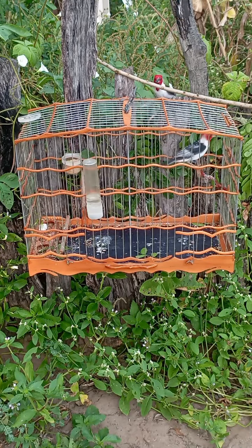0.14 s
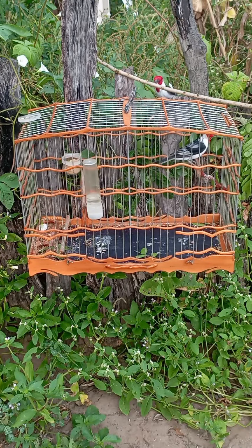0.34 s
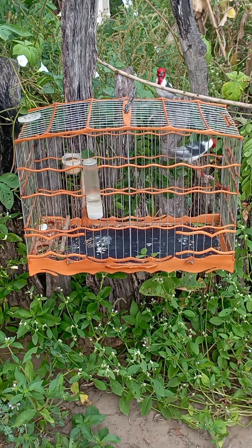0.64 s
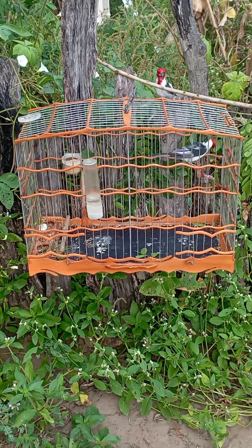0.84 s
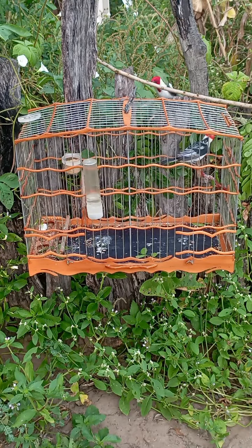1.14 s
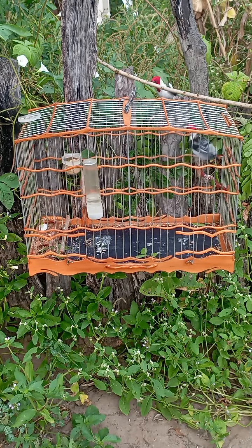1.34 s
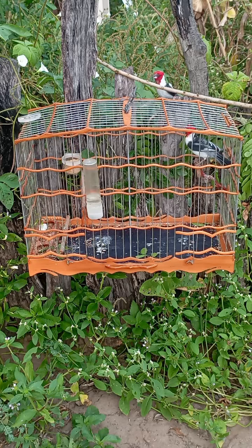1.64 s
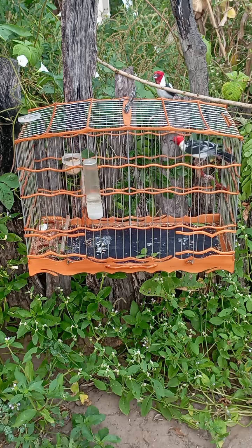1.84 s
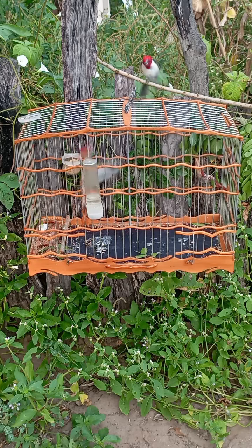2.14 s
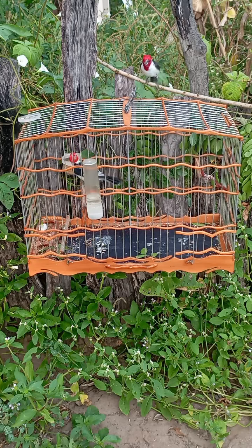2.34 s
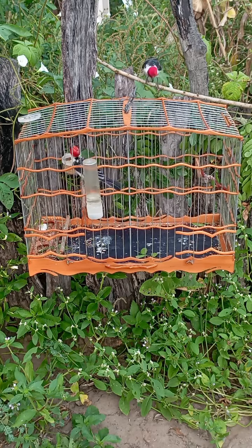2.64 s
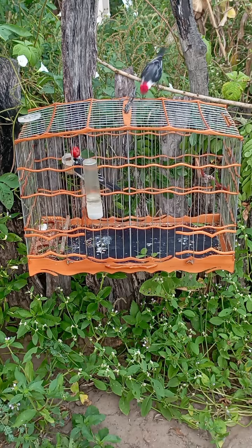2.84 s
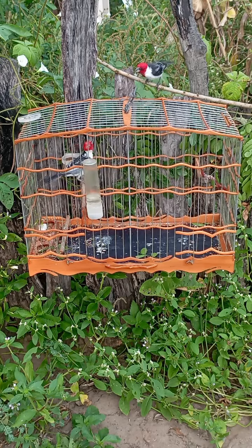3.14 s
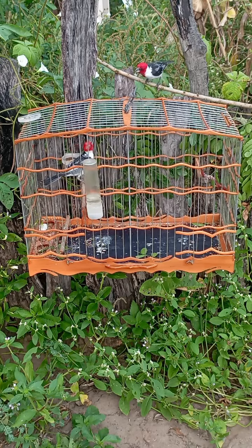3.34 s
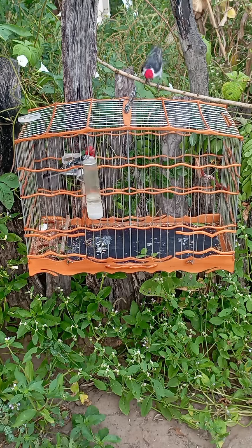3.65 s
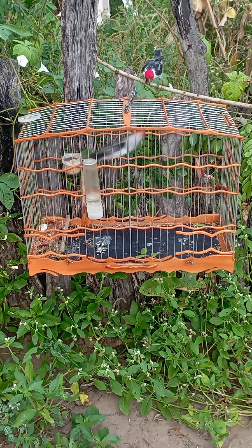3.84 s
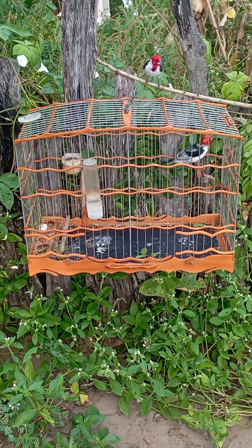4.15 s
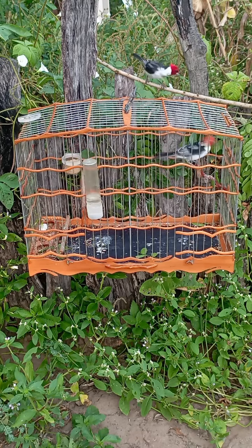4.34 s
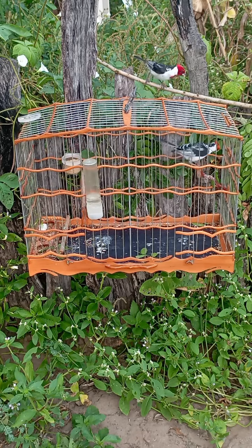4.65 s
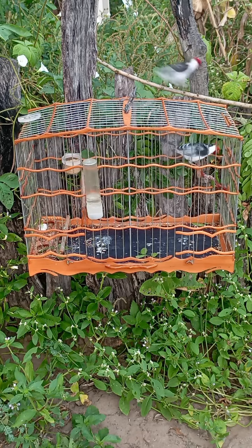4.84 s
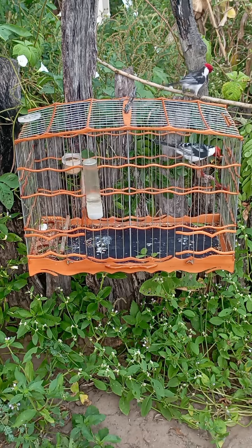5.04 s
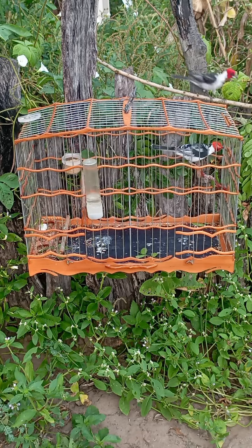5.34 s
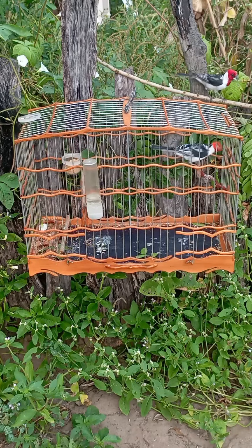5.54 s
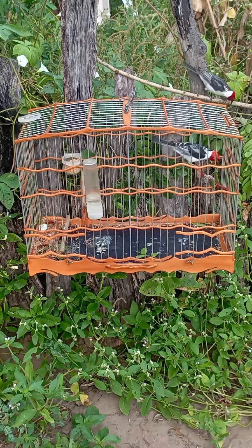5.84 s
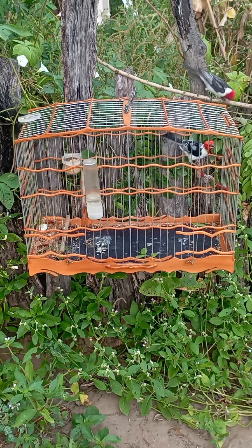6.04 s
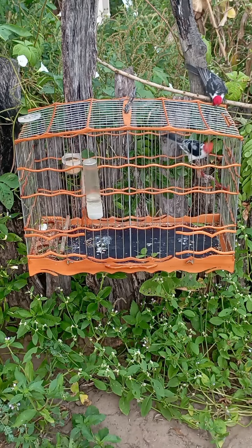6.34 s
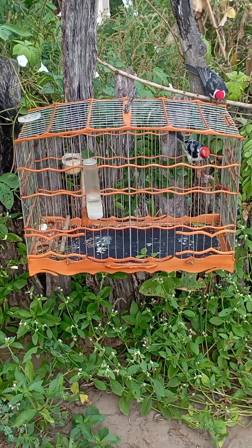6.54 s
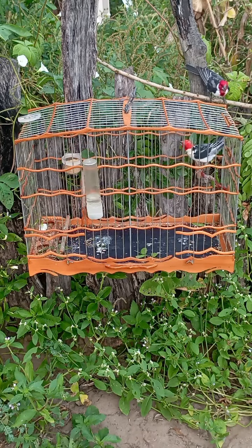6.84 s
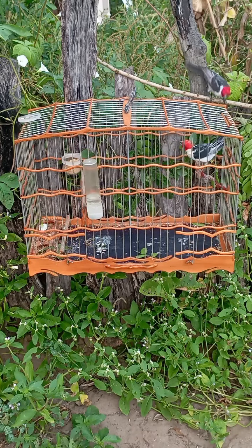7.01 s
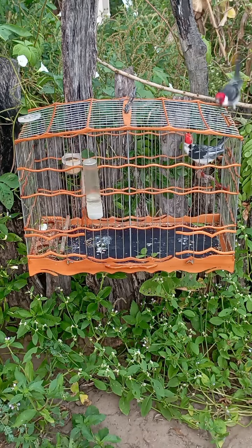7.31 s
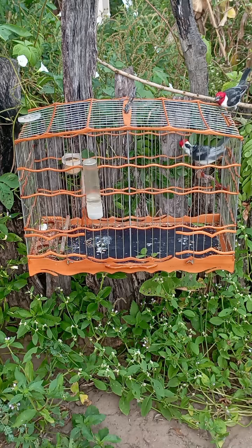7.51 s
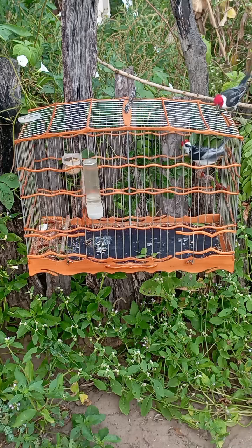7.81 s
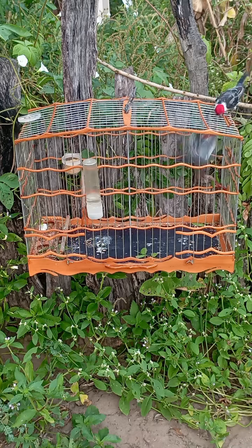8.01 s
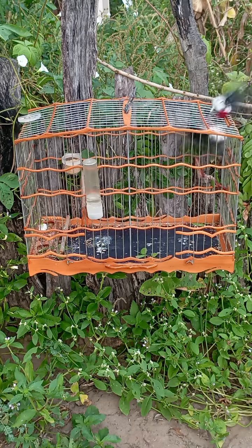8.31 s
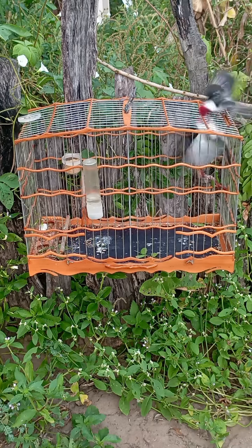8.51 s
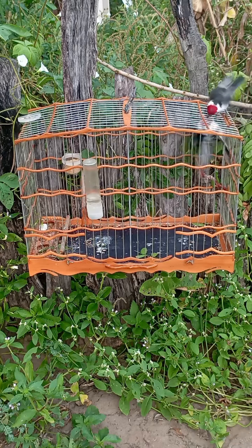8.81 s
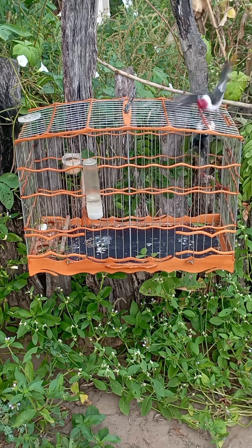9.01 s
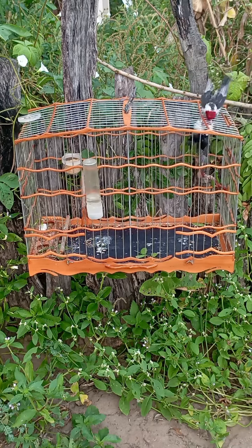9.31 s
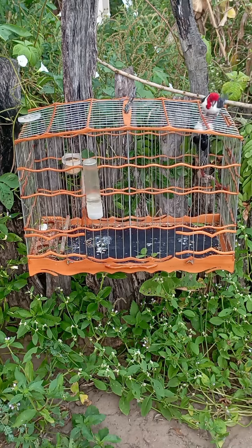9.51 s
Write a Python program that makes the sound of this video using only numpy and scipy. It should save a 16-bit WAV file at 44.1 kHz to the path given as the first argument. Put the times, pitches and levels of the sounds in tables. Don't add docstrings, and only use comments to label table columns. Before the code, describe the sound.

Stereo outdoor sound with little echo: crickets chirp in rapid bouts, slightly left, over a distant hum. One scratchy chip opens, then a rising loud chip, a whistle with a chip, and later a louder piercing whistle and quick doubled notes. Something hollow drags over grit and bumps, mostly toward the right. Finally two small birds scuffle through the wire, with dry rattling feather bursts and soft puffs of air.

```python
import sys
import numpy as np
from scipy import signal
from scipy.io import wavfile
from scipy.ndimage import uniform_filter1d

SR = 44100
rng = np.random.default_rng(int(sys.argv[2]) if len(sys.argv) > 2 else 0)


def waveform_to_disk(signal):
    frames = np.transpose(np.atleast_2d(signal))
    scaled = np.clip(frames, -1, 1) * 32767
    samples = np.round(scaled).astype(np.int16)
    wavfile.write(sys.argv[1], SR, samples)


def natural_amplitude(level_db):
    exponent = np.asarray(level_db, float) / 20
    return 10 ** exponent


N = 426447

# (first pulse [s], pulses [count])
LOW_CRICKET_BOUTS = [(.222, 20), (1.057, 17), (1.855, 19), (2.7, 18), (3.495, 18), (4.28, 19), (5.11, 16),
                     (5.905, 19), (6.726, 17), (7.605, 16), (8.395, 17), (9.285, 16)]
LOW_CRICKET_DB = [-0.2, -0.8, 0, -0.5, -0.2, -0.2, -0.5, -1, -2, -2, -0.3, -2.5]


def rms_one(x):
    return x / np.sqrt(np.mean(x ** 2) + 1e-20)


def in_time(rows, outside=None):
    s, *columns = np.transpose(rows)
    return [np.interp(np.arange(N) / SR, s, c, outside, outside) for c in columns]


def at_hz(points, hz):
    known_hz, known_db = np.array(points)[:, :2].T
    return np.interp(np.log(hz), np.log(known_hz), known_db)


def band(x, low_hz, high_hz, order=2):
    limits = [low_hz, min(high_hz, .45 * SR)]
    return signal.sosfilt(signal.butter(order, limits, "band", fs=SR, output="sos"), x)


def low_pass(x, hz, order):
    return signal.sosfilt(signal.butter(order, hz, fs=SR, output="sos"), x)


def drift(rate):
    return np.interp(np.arange(N) * rate / SR, np.arange(N // 100), rng.standard_normal(N // 100))


def coloured(spectrum, white):
    lowest, highest = spectrum[0][0], spectrum[-1][0]
    edges = lowest * 2 ** np.arange(0, np.log2(highest / lowest) + .1, 1 / 3)
    out = 0
    for k, (low, high) in enumerate(zip(edges, edges[1:])):
        gain = natural_amplitude(at_hz(spectrum, np.sqrt(low * high)))
        out = out + (-1) ** k * gain * band(white, low, high)
    return out


def resonance(x, hz, width):
    r = np.exp(-np.pi * width / SR)
    return signal.lfilter([(1 - r * r) / 2, 0, (r * r - 1) / 2], [1, -2 * r * np.cos(2 * np.pi * hz / SR), r * r], x)


def ports(x, lead, shade_db, shade_hz):
    late = np.interp(np.arange(N) - np.abs(lead), np.arange(N), x)
    bass = low_pass(late, shade_hz, 2)
    late = bass + natural_amplitude(shade_db) * (late - bass)
    return np.where(np.asarray(lead) >= 0, [x, late], [late, x])


def leaves(x, wet_db, t60):
    tail = rng.standard_normal((2, SR // 10)) * natural_amplitude(wet_db - 60 * np.arange(SR // 10) / SR / t60)
    tail[:, 0] = 1
    return signal.fftconvolve(np.atleast_2d(x), tail, axes=1)[:, :N]


def bursts(s, db, length, sharp):
    out, u = np.zeros(N), np.arange(int(3 * length * SR)) / (length * SR)
    shape = (1 - np.exp(-sharp * u)) * np.exp(-1.6 * u ** 2)
    for at, gain in zip(np.round(s * SR).astype(int), natural_amplitude(db)):
        out[at:at + len(u)] += (gain * shape)[:N - at]
    return out


def air():
    # (pitch [Hz], level [dB per Hz])
    rumble_spectrum = [(18, -38), (30, -11), (69, -2.5), (140, 2), (350, -6.5), (492, -7.5), (1200, -26.5)]
    # (pitch [Hz], level [dB per Hz])
    leaf_spectrum = [(1550, -20.5), (4310, -25), (5310, -19), (6050, -11), (6720, -20), (7260, -33.5),
                     (10700, -30.5), (15500, -38)]
    # (pitch [Hz], likeness [0 to 1])
    likeness = [(60, 0.068), (240, 0.45), (950, 0.16), (3770, 0.022), (15000, 0.047)]
    # (time [s], level [dB])
    breeze = [(0, -70), (2.3, -65.5), (4.2, -63.5), (4.7, -69.5), (5.5, -68.5), (6.3, -65.5), (7.2, -65),
              (7.65, -67.5), (8.3, -67), (9.0, -62.5), (9.35, -67.5), (9.67, -70)]
    rumble_db, leaves_db, gust_db, hum_db, flicker_db = -59, 0.5, -0.5, -66.5, 2.6
    breeze_db = in_time(breeze)[0] + gust_db * drift(1.33)
    hum = rms_one(resonance(rng.standard_normal(N), 67.8, 8.6))
    layers, edges = [0, 0], 35 * 2 ** np.arange(0, 9.1, .5)
    white = rng.standard_normal((2, 2, N))
    for k, (low_hz, high_hz) in enumerate(zip(edges, edges[1:])):
        mid, side = band(white[k % 2], low_hz, high_hz)
        hz = np.sqrt(low_hz * high_hz)
        alike = np.clip(at_hz(likeness, hz), 0, 1)
        tilt_db = np.array([[1], [-1]]) * 2.3 * (hz > 5000)
        gain = natural_amplitude(at_hz(rumble_spectrum + leaf_spectrum, hz) + flicker_db * drift(8) + tilt_db)
        both = np.sqrt(1 + alike) * mid + np.sqrt(1 - alike) * side * [[1], [-1]]
        layers[int(hz > 800)] += gain * both
    low, high = layers
    high = high / np.std(band(high, 2380, 5430))
    return natural_amplitude(hum_db) * hum + natural_amplitude(rumble_db) * rms_one(low) + natural_amplitude(leaves_db + breeze_db) * high


def chorus():
    out, t = np.zeros((2, N)), np.arange(N) / SR
    swell, swell_db, lag_s = 0, 13.5, 0.013
    for (s, count), db in zip(LOW_CRICKET_BOUTS, LOW_CRICKET_DB):
        middle_s = s + lag_s + 0.013 * count / 2
        swell = swell + natural_amplitude(db / 2) * np.exp(-((t - middle_s) / 0.29) ** 2)
    for level_db, low_hz, high_hz in zip((-68.5, -66.5), (5060, 5300), (5250, 5550)):
        for side in range(2):
            group = 0
            for hz, rate in zip(np.linspace(low_hz, high_hz, 5), rng.uniform(38, 60, 5)):
                turn = 2 * np.pi * (hz * t + np.cumsum(42 * drift(150)) / SR)
                stroke = np.maximum(np.sin(2 * np.pi * rate * t + rate) + 1.4, 0) * natural_amplitude(4.8 * drift(5))
                group = group + stroke * (np.sin(turn) + natural_amplitude(-17.0) * np.sin(2 * turn))
            out[side] += natural_amplitude(level_db + swell_db * swell + (2.5, -.6)[side]) * rms_one(group)
    return out


def cricket(bouts, bout_db, period, hz, duty, double_db):
    out, u = np.zeros(N + SR), np.linspace(0, 1, int(duty * period * SR))
    scratch = np.tile(0.7 + drift(230), 2)
    for (s, count), level_db in zip(bouts, bout_db):
        for k, (start, push) in enumerate(rng.standard_normal((count, 2))):
            turn = 2 * np.pi * np.cumsum(hz * (1.004 - 0.01 * u)) / SR + 3 * start
            at = round((s + (k - duty / 2) * period + .5) * SR)
            overtone = natural_amplitude(double_db) * scratch[at:at + len(u)] * np.sin(1.98 * turn)
            pulse = np.sin(np.pi * u) ** 0.29 * (np.sin(turn) + overtone)
            out[at:at + len(u)] += natural_amplitude(level_db + 1.8 * push) * pulse
    return out[SR // 2:SR // 2 + N]


def near_crickets():
    # (first pulse [s], pulses [count])
    high_bouts = [(-.16, 13), (.483, 14), (1.147, 14), (1.814, 13), (2.457, 13), (3.125, 13), (3.768, 13),
                  (4.439, 13), (5.08, 14), (5.872, 11), (6.464, 14), (7.136, 13), (7.806, 13), (8.449, 14),
                  (9.113, 13)]
    high_bout_db = [0.1, 0.1, 0.1, 0.1, 0.1, 0.1, 0.1, 0.1, 0.1, 0.1, 0.1, 0.1, 0.1, 0.1, 0.1]
    # (first pulse [s], pulses [count])
    peep_bouts = [(3.525, 8)]
    high = natural_amplitude(-51.5) * cricket(high_bouts, high_bout_db, .0248, 6605, duty=.6, double_db=-59)
    low = natural_amplitude(-51) * cricket(LOW_CRICKET_BOUTS, LOW_CRICKET_DB, .0187, 5520, duty=0.65, double_db=-7.5)
    low += natural_amplitude(-67) * cricket(peep_bouts, [0], 0.026, 3420, duty=0.84, double_db=-30)
    high = ports(high, 4.94, shade_db=-5.5, shade_hz=3000)
    return high + ports(low, 5.0, shade_db=-7.5, shade_hz=5600)


def distant_birds():
    # (start [s], length [s], from [Hz], to [Hz], level [dB])
    calls = [(2.431, 0.024, 3600, 4500, -60), (2.439, 0.041, 4310, 3660, -63),
             (2.507, 0.038, 3110, 2930, -65), (2.62, 0.024, 3650, 4100, -68),
             (2.718, .018, 4500, 4000, -63), (2.88, 0.021, 2500, 3120, -64),
             (2.899, 0.015, 2880, 2500, -62), (2.93, .03, 2600, 2550, -65), (3.625, .03, 4700, 4400, -55),
             (3.653, 0.022, 3450, 3170, -60), (3.669, 0.033, 4300, 4550, -63),
             (3.71, 0.067, 4250, 3480, -67), (3.774, .025, 2950, 2830, -61),
             (3.795, .045, 2850, 2750, -67.5), (3.777, .06, 4400, 3780, -66),
             (3.868, 0.032, 2310, 2100, -66), (6.168, 0.033, 1100, 1250, -68),
             (6.189, 0.042, 3150, 3040, -62), (6.216, 0.025, 3280, 3830, -58),
             (6.23, 0.034, 3750, 3880, -60), (6.25, 0.026, 2760, 2780, -65),
             (6.339, 0.034, 2390, 1450, -67), (6.459, .016, 2860, 3700, -58),
             (6.48, 0.034, 4120, 3790, -62), (6.57, 0.035, 2315, 1580, -67.5),
             (7.205, .03, 4100, 3960, -64), (8.07, .03, 2500, 3100, -68), (8.7, .03, 4200, 3820, -62),
             (9.07, .02, 2200, 2300, -67), (9.247, 0.08, 2710, 2672, -71), (9.33, 0.033, 2450, 2070, -70),
             (9.312, 0.018, 4000, 4200, -65), (9.599, 0.021, 1600, 1430, -71.5)]
    out = np.zeros(N)
    for s, length, from_hz, to_hz, db in calls:
        pitch, at = np.geomspace(from_hz, to_hz, int(length * SR)), round(s * SR)
        tone = np.sin(2 * np.pi * np.cumsum(pitch) / SR)
        out[at:at + len(pitch)] += natural_amplitude(db) * np.hanning(len(pitch)) ** .5 * tone
    return leaves(out * natural_amplitude(4.6 * drift(220)), wet_db=-24.5, t60=0.17)


def far_bird():
    # (offset [s], length [s], from [Hz], to [Hz], level [dB])
    phrase = [(-.043, 0.0161, 2460, 1493, -0.5), (-.02, 0.026, 1580, 1350, -0.5),
              (-.014, 0.0064, 2800, 2240, 4.5), (0, .028, 2200, 2050, 0.5), (.005, 0.02, 1240, 1000, -6)]
    # (first phrase [s], last phrase [s], peak level [dB])
    runs = [(.143, 1.373, -74), (2.389, 2.8, -75), (3.691, 3.691, -77), (7.245, 7.245, -81),
            (8.6, 8.6, -78), (8.755, 9.2, -81), (4.615, 5.315, -79), (5.575, 5.575, -80), (6.02, 6.02, -80),
            (8.09, 8.09, -79)]
    gap_s, out, phrases = .205, np.zeros(N), []
    for first, last, db in runs:
        count = round((last - first) / gap_s) + 1
        phrases += [(s, db) for s in np.linspace(first, last, count)]
    for (s, db), chance in zip(phrases, rng.standard_normal((len(phrases), 2, len(phrase)))):
        for (offset, length, from_hz, to_hz, slur_db), bend, push in zip(phrase, *chance):
            glide = np.geomspace(from_hz, to_hz, int(length * SR)) * (1 + 0.0353 * bend)
            at = round((s + offset) * SR)
            tone = np.hanning(len(glide)) ** 0.035 * np.sin(2 * np.pi * np.cumsum(glide) / SR)
            out[at:at + len(glide)] += natural_amplitude(db + slur_db + 6.0 + 2.0 * push) * tone
    return leaves(ports(out * natural_amplitude(5 * drift(250)), 1.3, shade_db=-3.0, shade_hz=4000), wet_db=-26, t60=.08)


def drag():
    # (start [s], end [s], force at start [dB], force at end [dB], grit [dB])
    strokes = [
        (1.785, 2.171, -47.5, -61, -24),
        (3.053, 3.171, -48.5, -54.5, -25.5),
        (3.923, 4.373, -62, -56, -27.5),
        (6.76, 7.3, -60, -73, -34),
    ]
    # (pitch [Hz], width [Hz], level [dB])
    rings = [(269, 17, -3.5), (617, 15, -6.5), (815, 11, -8), (1305, 280, 2.5), (1580, 29, 5)]
    # (pitch [Hz], level [dB per Hz])
    grit_spectrum = [(1060, -45), (1800, -11), (3120, 3), (4720, -1.5), (5400, -20), (6020, -9.5),
                     (11000, -16), (15500, -30)]
    # (start [s], length [s], pitch [Hz], level [dB])
    catches = [(1.735, .16, 600, -52), (1.772, .07, 825, -55), (1.88, .1, 1310, -51),
               (2.08, .07, 1450, -54), (3.07, .09, 1280, -56), (3.81, 0.13, 820, -61.5),
               (4.02, .07, 1430, -57), (4.18, 0.2, 1324, -55.5), (4.97, .07, 1000, -67),
               (4.22, 0.14, 520, -56)]
    rise_s, fall_s, edge_db = .1, 0.09, -22
    brighten_db, catch_width_hz = 7.5, 90
    grit = rng.standard_normal(N) * natural_amplitude(2.5 * drift(200) + .8 * drift(25))
    low = sum(natural_amplitude(db) * resonance(grit, hz, width) for hz, width, db in rings[:3])
    low = rms_one(low + 0.22 * band(grit, 350, 1310))
    middle = sum(natural_amplitude(db) * resonance(grit, hz, width) for hz, width, db in rings[3:])
    middle = rms_one(middle + 0.031 * band(grit, 790, 2300))
    high = coloured(grit_spectrum, grit)
    high = high / np.std(band(high, 8310, 8560))
    out = 0
    for start, end, start_db, end_db, grit_db in strokes:
        force_db, = in_time([(start - rise_s, start_db + edge_db), (start, start_db), (end, end_db),
                             (end + fall_s, end_db + edge_db)], -120)
        dull_db, = in_time([(start, -brighten_db), (end, 0)])
        upper = natural_amplitude(dull_db) * (natural_amplitude(5.0) * middle + natural_amplitude(grit_db + 12.5) * high)
        out = out + natural_amplitude(force_db) * (natural_amplitude(0.9) * low + upper)
    for s, length, hz, db in catches:
        at, span = round(s * SR), round(length * SR)
        ring = resonance(resonance(grit[at:at + span], hz, catch_width_hz), hz, 2 * catch_width_hz)
        out[at:at + span] += natural_amplitude(db) * np.hanning(span) * rms_one(ring)
    return ports(out, -2.5, shade_db=-30.5, shade_hz=4000)


def knocks():
    # (time [s], peak level [dB], brightness [dB])
    blows = np.array([(1.505, -62, 4.5), (2.401, -51, -7), (3.664, -45, -36), (3.779, -39, -35),
                      (3.908, -41, -24), (3.981, -39.5, -39), (4.052, -47, -2.5), (4.094, -46, -5.5),
                      (4.366, -35, -36), (4.581, -48.5, -7.5), (4.732, -46, -10), (4.982, -46, -3.5),
                      (5.035, -46, -31), (5.838, -51.5, -6.5), (5.886, -46.5, -9), (5.908, -81, -21),
                      (7.389, -46.5, -2.5), (7.518, -43.5, -31), (9.539, -68, 4)])
    # (pitch [Hz], level [dB], time to fall 60 dB [s])
    modes = [(117, -10, 0.048), (234.4, 3, 0.11), (441, 2, 0.054), (502, -2, 0.04), (639, -18.5, 0.23),
             (1047, -13, 0.044)]
    s, blow_db, bright_db = blows.T
    out = np.zeros(N)
    for hz, db, t60 in modes:
        peak_db = blow_db + db + np.log2(hz / 175).clip(0, 1.5) * bright_db
        push = bursts(s - .004, peak_db, 0.077, sharp=50.0)
        ring = resonance(push * rng.standard_normal(N), hz, 2.02 / t60)
        out += ring * np.sqrt(t60 * SR) * natural_amplitude(-10)
    return ports(band(out, 60, 1550), -7, shade_db=-27.0, shade_hz=3000)


def flaps():
    # (time [s], peak level [dB], low puff [dB])
    beats = [(2.136, -48.5, -49), (2.7594, -57, -81), (4.164, -59, -72), (6.4672, -58, -76),
             (7.389, -67, -46.5), (7.402, -52, -63), (7.518, -54, -50.5), (8.0667, -75, -62),
             (8.128, -58, -54.5), (8.188, -41.5, -44.5), (8.2073, -47.5, -50), (8.267, -51, -50.5),
             (8.293, -46, -45.5), (8.3234, -47, -55), (8.3954, -65, -73), (8.445, -43.5, -48.5),
             (8.4765, -49, -49), (8.514, -56, -50), (8.554, -41.5, -48.5), (8.733, -54.5, -69),
             (8.774, -53, -55.5), (8.8584, -60, -54.5), (8.891, -55, -59), (9.082, -58, -77),
             (9.146, -59, -77), (9.205, -54.5, -58), (9.286, -75, -78), (9.386, -57, -74),
             (9.4316, -65, -63), (9.476, -64, -66), (9.503, -69, -73), (8.615, -68, -57), (8.665, -60, -53),
             (8.695, -62, -59), (5.3, -70, -64)]
    # (pitch [Hz], level [dB per Hz])
    feather_spectrum = [(1760, -30), (3000, 13), (4470, 0.5), (5380, 0), (5880, -1.5), (11500, 5),
                        (15500, -7)]
    s, peak_db, puff_db = np.transpose(beats)
    beat_s, shiver_s, shiver_db = 0.034, 0.099, -16.5
    grain = rng.standard_normal(N) * natural_amplitude(3.2 * drift(400))
    brush = bursts(s, peak_db, beat_s, sharp=37.0) * natural_amplitude(1.5)
    shiver = bursts(s, peak_db + shiver_db, shiver_s, sharp=33.0)
    bright = rms_one(coloured(feather_spectrum, grain)) * (brush + shiver)
    puff = rms_one(band(grain, 81, 980, order=1)) * bursts(s, puff_db, beat_s, sharp=5.4)
    return ports(bright + puff, 5.6, shade_db=-6.5, shade_hz=5660)


def bird_voices():
    # (time [s], pitch [Hz], level [dB])
    clear = [
        [(3.267, 1990, -39), (3.288, 2277, -36.5), (3.302, 1896, -39), (3.316, 2240, -37.5), (3.343, 3030, -24),
         (3.356, 2810, -32), (3.372, 2210, -32), (3.392, 1515, -43.5), (3.414, 780, -61)],
        [(6.712, 2000, -50), (6.735, 2380, -47), (6.755, 2463, -30), (6.782, 2310, -37), (6.796, 2670, -28.5),
         (6.823, 3580, -18), (6.834, 3130, -29), (6.848, 2700, -30.5), (6.858, 1560, -37)],
        [(7.748, 3210, -31), (7.765, 3220, -33), (7.777, 4000, -29), (7.787, 2760, -32), (7.795, 2410, -32),
         (7.811, 2970, -22.5), (7.819, 2700, -40), (7.826, 2430, -27), (7.833, 2160, -58)],
        [(7.856, 1140, -45), (7.868, 2405, -37), (7.878, 3165, -25.5), (7.886, 3280, -34), (7.893, 2110, -38),
         (7.902, 1730, -44.5), (7.919, 1370, -53)],
    ]
    # (time [s], pitch [Hz], level [dB])
    harsh = [
        [(.406, 5370, -45), (.424, 5920, -31), (.432, 5600, -27), (.438, 6600, -40), (.449, 7790, -36),
         (.462, 6100, -26.5), (.471, 5250, -29), (.479, 4570, -34), (.489, 6070, -23)],
        [(1.554, 2770, -49), (1.572, 2760, -33.5), (1.6, 3300, -23.5), (1.643, 4750, -33), (1.652, 4960, -16),
         (1.662, 5390, -27.5), (1.67, 4990, -23.5), (1.681, 3340, -26.5), (1.687, 2600, -41)],
        [(3.424, 3000, -45), (3.438, 4410, -29), (3.446, 4000, -21), (3.456, 4120, -34), (3.464, 3660, -40),
         (3.469, 2880, -26), (3.476, 3900, -33), (3.485, 4000, -32.5), (3.494, 3700, -35)],
        [(5.665, 3040, -56), (5.685, 3380, -35), (5.696, 3590, -22.5), (5.704, 4110, -26), (5.712, 5640, -28.5),
         (5.718, 4620, -30), (5.734, 3560, -30)],
        [(6.882, 4000, -43), (6.89, 4160, -39), (6.906, 3620, -21.5), (6.914, 4510, -27.5), (6.922, 5750, -28),
         (6.931, 5360, -27), (6.943, 3600, -25.5), (6.948, 3400, -42)],
    ]
    # (time [s], pitch [Hz], level [dB])
    stack = [
        [(.394, 2184, -44), (.42, 2885, -37), (.433, 2910, -40), (.446, 2850, -46), (.46, 2900, -38),
         (.476, 2880, -39), (.486, 2900, -48)],
        [(.424, 3700, -48), (.436, 3800, -44), (.452, 3710, -31), (.463, 3750, -41), (.474, 3780, -34),
         (.49, 3730, -41)],
        [(.398, 7660, -56), (.42, 9360, -49), (.436, 10300, -38), (.45, 9440, -28)],
        [(.399, 3840, -48), (.418, 4750, -29.5), (.428, 5070, -28), (.445, 5000, -36), (.458, 4700, -42)],
        [(.406, 6700, -51), (.422, 7800, -32), (.433, 7970, -38), (.447, 8950, -32), (.463, 7060, -35),
         (.475, 5750, -29)],
        [(1.648, 4320, -33), (1.665, 2560, -35.5), (1.682, 1626, -44.5), (1.7, 3090, -32.5), (1.71, 2690, -41),
         (1.724, 3650, -31), (1.75, 2630, -36), (1.772, 2570, -53)],
    ]
    # (start [s], length [s], from [Hz], to [Hz], level [dB])
    slurs = [(6.945, .027, 2960, 2135, -33.5), (5.666, 0.044, 6150, 7400, -47.5),
             (0.405, .03, 1600, 1900, -56), (.455, .03, 2050, 2000, -56), (.412, 0.039, 10300, 10900, -42),
             (0.453, 0.031, 10600, 6970, -32), (.466, .012, 6350, 6000, -35),
             (0.485, 0.015, 4200, 4540, -40), (1.639, .016, 9400, 5500, -38),
             (1.663, 0.017, 10600, 9640, -33), (1.734, 0.027, 9400, 7700, -54),
             (3.295, .02, 4000, 3870, -46), (3.41, 0.032, 1650, 1500, -51), (3.428, 0.031, 8600, 8240, -42),
             (3.469, .02, 8300, 8000, -48), (1.649, 0.029, 8800, 7340, -33),
             (3.213, 0.036, 3520, 4300, -49), (3.272, 0.14, 3130, 3600, -47),
             (3.39, 0.024, 3210, 1800, -43), (3.441, 0.017, 6310, 3640, -32),
             (3.444, 0.0225, 2400, 1260, -44.5), (3.461, 0.029, 1380, 1580, -42.5),
             (3.486, 0.0278, 1580, 780, -52), (3.469, 0.039, 3480, 1800, -38),
             (5.504, 0.07, 3630, 3700, -53), (5.698, 0.049, 2900, 1443, -42),
             (5.751, 0.0166, 1504, 2230, -44), (5.722, 0.027, 3000, 2345, -29),
             (6.864, 0.023, 1550, 2170, -42.5), (6.883, 0.029, 2130, 1650, -41),
             (6.935, 0.017, 1980, 1550, -41), (6.956, 0.029, 1490, 860, -58)]
    voice = np.zeros(N, complex)
    for rows in clear + harsh + stack:
        s, hz, db = np.transpose(rows)
        at = np.arange(round(s[0] * SR), round(s[-1] * SR))
        pitch = uniform_filter1d(np.interp(at / SR, s, hz), size=260, mode="nearest")
        level = natural_amplitude(np.interp(at / SR, s, db)) * signal.windows.tukey(len(at), .12)
        voice[at] += level * np.exp(2j * np.pi * np.cumsum(pitch) / SR)
    for s, length, from_hz, to_hz, db in slurs:
        pitch, at = np.geomspace(from_hz, to_hz, int(length * SR)), round(s * SR)
        swell = np.sin(np.linspace(0, np.pi, len(pitch))).clip(0) ** 0.74
        voice[at:at + len(pitch)] += natural_amplitude(db) * swell * np.exp(2j * np.pi * np.cumsum(pitch) / SR)
    return voice * natural_amplitude(1.76 * drift(300))


def birds():
    # (start [s], sum and double tones [dB], triple and fourth tones [dB], rasp [dB], left lead [samples])
    call_colour = np.array([(.39, -16, -26, -20, 6.0), (1.55, -20, -36, -33, 5.8),
                            (1.645, -27, -32, -23, 5.8), (1.7, -40, -24, -36, 6.2),
                            (3.2, -24, -22, -36, 5.1), (3.417, -17, -26, -18, 5.7),
                            (5.65, -21, -28, -21, 6.1), (6.1, -36, -25, -36, 4.8),
                            (6.865, -20, -20, -19, 5.8), (7.74, -34, -25, -36, 3.64),
                            (7.85, -24, -26, -33, 3.1)])
    # (delay [s], level [dB])
    echoes = [(.0031, -13), (.0078, -19), (0.0134, -24), (.023, -30)]
    voice = bird_voices()
    call = np.maximum(np.searchsorted(call_colour[:, 0], np.arange(N) / SR) - 1, 0)
    _, double, triple, rasp, lead = call_colour[call].T
    flutter = low_pass(rng.standard_normal((2, N)), 450, 4)
    shake = (flutter[0] + 1j * flutter[1]) / flutter.std()
    voice *= 1 + natural_amplitude(rasp + 10) * shake
    effort = uniform_filter1d(np.abs(voice), size=200) + 1e-6
    spin = voice / effort
    fourth_db, full_effort_db = -8, -41
    overtones = natural_amplitude(double) + natural_amplitude(triple) * spin * (1 + natural_amplitude(fourth_db) * spin)
    bent = voice * spin * overtones * np.minimum(effort / natural_amplitude(full_effort_db), 1)
    bent = band(bent.real, 6000, 13200)
    hiss = natural_amplitude(rasp) * effort * rms_one(band(rng.standard_normal(N), 2000, 12600, order=1))
    direct = voice.real + bent + hiss
    wet = direct.copy()
    for s, db in echoes:
        delay = round(s * SR)
        wet[delay:] += natural_amplitude(db) * direct[:-delay]
    tail = rng.standard_normal((2, SR // 4)) * natural_amplitude(-60 * np.arange(SR // 4) / SR / 0.27)
    foliage = natural_amplitude(-48) * signal.fftconvolve(direct[None], tail, axes=1)[:, :N]
    side_gain = natural_amplitude(np.array([[0], [-1.8]]))
    return side_gain * ports(wet, lead, shade_db=-6.5, shade_hz=5500) + foliage


def scene():
    background = air() + chorus() + near_crickets() + distant_birds() + far_bird()
    return background + drag() + knocks() + flaps() + birds()


def roll_off(x):
    return signal.sosfilt(signal.butter(12, 15700, fs=SR, output="sos"), x)


def record(dry):
    mix = signal.sosfilt(signal.cheby2(10, 50, 15800, fs=SR, output="sos"), dry)
    mix = signal.sosfilt(signal.butter(3, 48, "high", fs=SR, output="sos"), mix)
    return roll_off(mix)


dry = scene()
out = record(dry)
waveform_to_disk(out)
```